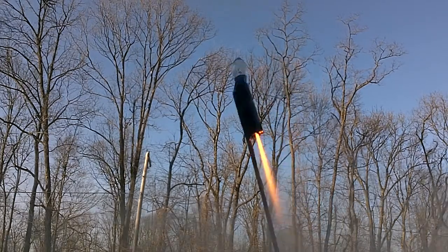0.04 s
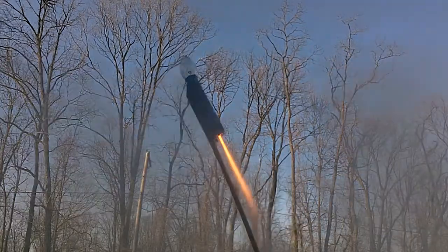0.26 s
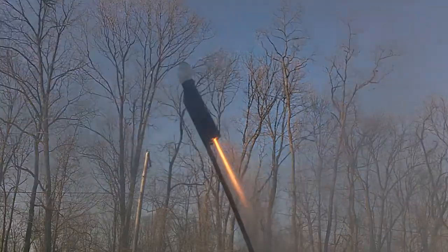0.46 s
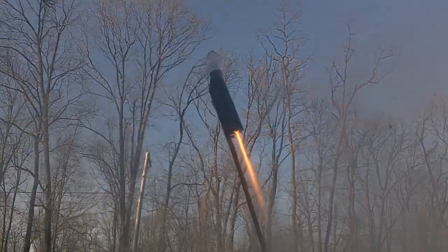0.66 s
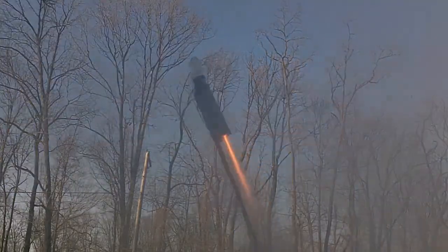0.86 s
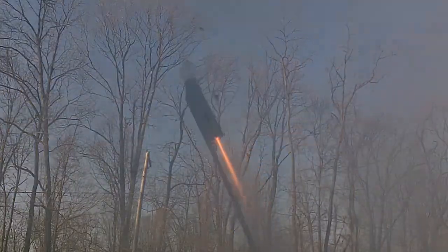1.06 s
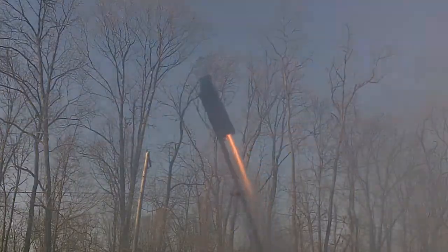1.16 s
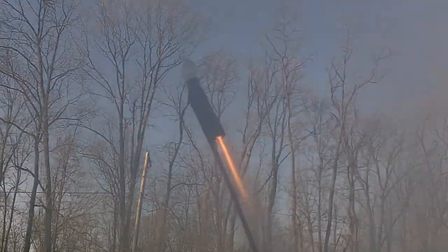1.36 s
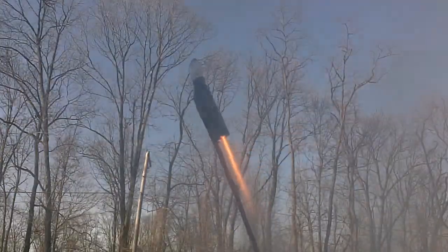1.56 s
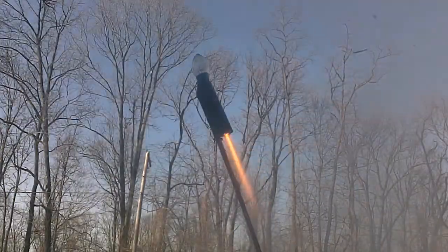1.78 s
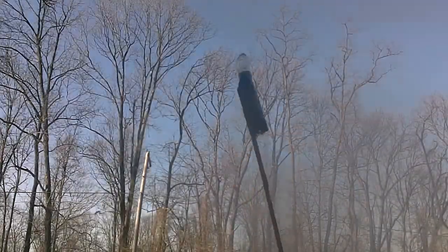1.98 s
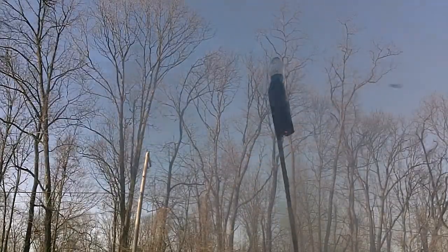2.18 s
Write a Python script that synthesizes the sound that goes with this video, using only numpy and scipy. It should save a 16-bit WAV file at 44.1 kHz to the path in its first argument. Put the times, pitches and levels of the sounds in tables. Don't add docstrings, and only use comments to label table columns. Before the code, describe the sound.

A small rocket motor roars from the start, swelling within 0.15 seconds into a harsh, bright, rushing hiss with low rumble. The close microphone overloads in dense rough crackles, thinning around 0.9-1.2 seconds and briefly near 1.5 and 1.6. At about 1.9 seconds the burn stops abruptly. Near-quiet follows; a faint smoky hiss rises from 2.0, with one tiny dry casing tick at 2.1.

```python
import sys
import numpy as np
from scipy import signal
from scipy.fft import rfft, irfft, next_fast_len
from scipy.io import wavfile
from scipy.ndimage import uniform_filter1d

SR = 44100
rng = np.random.default_rng(int(sys.argv[2]) if len(sys.argv) > 2 else 0)


def dump(signal):
    limited = np.clip(np.atleast_2d(signal).T, -1, 1)
    pcm = np.round(limited * 32767).astype(np.int16)
    wavfile.write(sys.argv[1], SR, pcm)


def attenuation_scalar(level_db):
    decades = np.asarray(level_db, float) / 20
    return 10 ** decades


N = 98343

# start_s, level_db, jolt_rate_db, nozzle_aim [0-1, 1 = toward the camera]
BURN_CURVE = [(0, -16, -22, 0), (.04, -11, 1, 0), (.14, -7.5, 5, 0), (.235, -9.5, 6, 0.5),
              (.27, -11.5, -6, 0.24), (.46, -9.5, 0.5, 0.17), (.55, -10, -6, 0.05), (.62, -9.5, 0.5, 0.46),
              (.79, -9.5, 3, 0.48), (.86, -10.5, -11, 0.7), (1.1, -13.5, -12, 0.18), (1.2, -12, -5, 0.85),
              (1.44, -10.5, -1, .9), (1.49, -12.5, -12, 0.44), (1.54, -10, -2, 0.76),
              (1.585, -12, -7, 0.83), (1.8, -9.5, 2, 1), (1.91, -11, -3, 0.36)]
BURNOUT_S, DIE_DB_PER_S = 1.908, 420

# pitch_hz, level_db [dB per Hz]
JET_COLOUR = [(30, -11), (200, -2.5), (1300, -14.5), (2200, -1), (4000, 7), (9000, 3.5), (13000, 7),
              (15000, 0.5)]
# pitch_hz, gain_db
AIM_COLOUR = [(3000, 0.5), (4800, -7), (6500, 5), (8500, -3.5), (9600, 8.5), (11500, -2), (15000, 1.5)]
SURGE_DB, SPUTTER_DB, FLICKER_DB = 0.3, 1.3, 0.8
RUMBLE_DB, RUMBLE_HZ = -23, 69

# start_s, size [signed, full scale 1], hold_ms
LONE_JOLTS = [(0.2528, -0.17, 4), (0.2534, 0.35, 5.5), (0.2605, -0.22, 1.2), (0.2649, 0.23, 1.7),
              (0.2793, -0.28, 3), (0.2798, 0.38, 0.8), (0.2829, -0.21, 2.3), (0.849, -0.31, 0.3),
              (0.8856, 0.37, 0.5), (0.8932, 0.3, 1.2), (0.9019, 0.3, 0.3), (0.9122, 0.18, 2.3),
              (0.9303, 0.19, 5.5), (0.9391, 0.22, 2.3), (0.9489, 0.47, 0.8), (0.9577, 0.19, 1.2),
              (0.9605, 0.31, 0.5), (0.9789, -0.25, 0.5), (1.0039, 0.27, 1.7), (1.0193, 0.2, 5.5),
              (1.0582, -0.32, 0.3), (1.0655, 0.28, 2.3), (1.1206, -0.22, 2.3), (1.1644, -0.26, 1.7),
              (1.1785, -0.23, 3), (1.474, 0.29, 1.2), (1.4772, 0.2, 5.5), (1.6137, 0.36, 0.3),
              (1.6365, 0.21, 4), (1.6525, -0.46, 0.3)]
# start_s, end_s
JOLT_LULLS = [
    (.25, .29),
    (.88, 1.19),
    (1.47, 1.51),
    (1.575, 1.66),
]
JOLTS_PER_S, JOLT_S, LONGEST_JOLT_S, JOLT_SHORTEN = 1000, 0.0005, 0.003, 0.68
JOLT_DB, JOLT_SPREAD_DB, LULL_DB, LONE_DB = -16.5, 2, -5, -3.5
JOLT_SAG_HZ, JOLT_EDGE_HZ = 31, 19000
OFFSET_DB, OFFSET_SAG_HZ = -19.5, 3.6

# pitch_hz, level_db [dB per Hz]
SMOKE_COLOUR = [(30, 14.5), (80, -1), (180, -16), (500, -13), (1300, -13.5), (2200, -3.5), (6000, 7.5),
                (12000, 7.5)]
SMOKE_DB, STILL_FLICKER_DB = -24.5, 1.2
DUCK_DB, RECOVER_START_S, RECOVER_END_S = -17.5, 1.995, 2.135

# pitch_hz, level_db [dB per Hz]
WOOD_COLOUR = [(30, 0), (150, -14), (500, -10), (1300, -12.5), (2200, -7.5), (5000, -16), (15000, -30)]
WOOD_DB, WOOD_DUCK_SHARE = -49, 0.38

# pitch_hz, level_db, t60_s
CASING_MODES = [
    (400, -18, .015),
    (1850, 0, .006),
    (3300, 0, .0055),
    (4300, -4, .006),
]
TICK_S, TICK_DB, TICK_RISE_S = 2.1053, -13, 0.0004
TICK_REBOUND_S, TICK_REBOUND_DB = 0.00214, -9

NOTCH_HZ = (2695, 5490, 7865, 10940)
NOTCH_WIDTH_HZ = (877, 1230, 2360, 1500)
NOTCH_DEPTH_DB = (-36, -42, -48, -38)
TOP_HZ, CAPSULE_LIMIT, CAMERA_GAIN_DB = 15330, 1.13, 5.0


def shape(x, gain):
    n = next_fast_len(N + 4096)
    hz = np.arange(n // 2 + 1) * SR / n + 1e-3
    return irfft(rfft(x, n) * gain(hz), n)[..., :N]


def colour_gain(f, colour):
    hz, db = np.array(colour).T
    return attenuation_scalar(np.interp(np.log(f), np.log(hz), db))


def walk(rate):
    hold = int(SR / rate)
    levels = np.repeat(rng.standard_normal(N // hold + 1), hold)
    slewed = uniform_filter1d(uniform_filter1d(levels, hold), hold)[:N]
    return slewed / slewed.std()


def hiss(colour, flicker_db):
    out = 0
    for mid_hz in 30 * 2.0 ** np.arange(10):
        def octave(f):
            bell = np.cos(np.pi / 2 * np.clip(np.log2(f / mid_hz), -1, 1))
            return bell * colour_gain(f, colour)
        band = shape(rng.standard_normal(N), octave)
        out = out + band * attenuation_scalar(flicker_db * walk(22))
    return out / out.std()


def burn_db(t):
    start_s, level_db, _, _ = np.array(BURN_CURVE).T
    return np.interp(t, start_s, level_db) - DIE_DB_PER_S * np.maximum(t - BURNOUT_S, 0)


def jet(t):
    rumble = shape(rng.standard_normal(N), lambda f: 1 / (1 + 1j * f / RUMBLE_HZ) ** 2)
    rush = hiss(JET_COLOUR, FLICKER_DB) * attenuation_scalar(SURGE_DB * walk(11.81) + SPUTTER_DB * walk(150))
    start_s, _, _, nozzle_aim = np.array(BURN_CURVE).T
    aim = np.clip(np.interp(t, start_s, nozzle_aim), 0, 1)
    facing = shape(rush, lambda f: colour_gain(f, AIM_COLOUR))
    rush += aim * (facing - rush)
    return (rush + attenuation_scalar(RUMBLE_DB) * rumble / rumble.std()) * attenuation_scalar(burn_db(t))


def jolts(t):
    start_s, _, rate_db, _ = np.array(BURN_CURVE).T
    crowd = attenuation_scalar(2 * np.interp(t, start_s, rate_db)) * (t < BURNOUT_S) + 1e-9
    wait, hold, sign, size = rng.random((4000, 4)).T

    arrivals = np.cumsum(-np.log(wait))
    expected = np.cumsum(crowd) * JOLTS_PER_S / SR
    start = np.interp(arrivals, expected, np.arange(N), right=N - 1)
    end = start - JOLT_S * SR * np.log(hold) / crowd[start.astype(int)] ** JOLT_SHORTEN
    next_start = np.append(start[1:], N - 1)
    end = np.minimum(end, np.minimum(next_start, start + LONGEST_JOLT_S * SR))

    spread_db = JOLT_SPREAD_DB * np.log(size / (1 - size)) / 2
    step = np.sign(sign - 0.5) * attenuation_scalar(JOLT_DB + spread_db)
    in_lull = sum((start > a * SR) & (start < b * SR) for a, b in JOLT_LULLS)
    step *= attenuation_scalar(LULL_DB * in_lull)

    lone_s, lone_size, lone_ms = np.array(LONE_JOLTS).T
    start = np.append(start, lone_s * SR)
    end = np.append(end, (lone_s + lone_ms / 1000) * SR)
    step = np.append(step, lone_size * attenuation_scalar(LONE_DB))

    kicks = np.bincount(start.astype(int), step, N) - np.bincount(end.astype(int), step, N)
    steps = shape(kicks, lambda f: SR / (2 * np.pi) / (1j * f + JOLT_SAG_HZ) / (1 + 1j * f / JOLT_EDGE_HZ))
    offset = shape(attenuation_scalar(burn_db(t) + OFFSET_DB), lambda f: 1j * f / (1j * f + OFFSET_SAG_HZ))
    return steps - offset


def duck_db(t):
    return np.interp(t, [RECOVER_START_S, RECOVER_END_S], [DUCK_DB, 0])


def smoke(t):
    return hiss(SMOKE_COLOUR, STILL_FLICKER_DB) * attenuation_scalar(SMOKE_DB + duck_db(t))


def wood(t):
    return hiss(WOOD_COLOUR, STILL_FLICKER_DB) * attenuation_scalar(WOOD_DB + WOOD_DUCK_SHARE * duck_db(t))


def tick(t):
    out = 0
    for late_s, hit_db in ((0, TICK_DB), (TICK_REBOUND_S, TICK_DB + TICK_REBOUND_DB)):
        age = np.maximum(t - TICK_S - late_s, 0)
        rise = 1 - np.exp(-age / TICK_RISE_S)
        for hz, db, t60 in CASING_MODES:
            decay_db = 20 * np.log10(1000) * age / t60
            out = out - rise * attenuation_scalar(hit_db + db - decay_db) * np.sin(2 * np.pi * hz * age)
    return out


def scene():
    t = np.arange(N) / SR
    return np.tile(jet(t) + jolts(t) + smoke(t) + wood(t) + tick(t), (2, 1))


def notches(f):
    gain = 1 / (1 + (f / TOP_HZ) ** 200)
    for hz, width, db in zip(NOTCH_HZ, NOTCH_WIDTH_HZ, NOTCH_DEPTH_DB):
        detune = hz ** 2 - f ** 2
        gain = gain * (detune + 1j * f * width * attenuation_scalar(db)) / (detune + 1j * f * width)
    return gain


def band_limit(x):
    return signal.sosfilt(signal.butter(12, 15220, fs=SR, output="sos"), x)


def record(dry):
    soft = CAPSULE_LIMIT * np.tanh(dry / CAPSULE_LIMIT)
    mix = np.clip(shape(soft, notches) * attenuation_scalar(CAMERA_GAIN_DB), -1, 1)
    return band_limit(mix)


dry = scene()
out = record(dry)
dump(out)
```